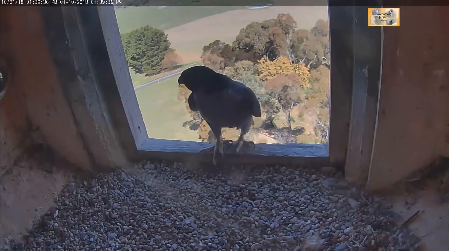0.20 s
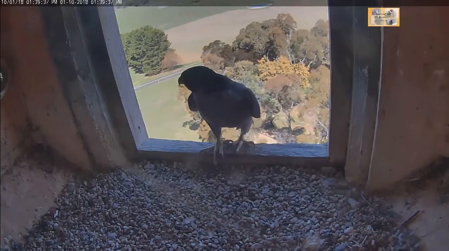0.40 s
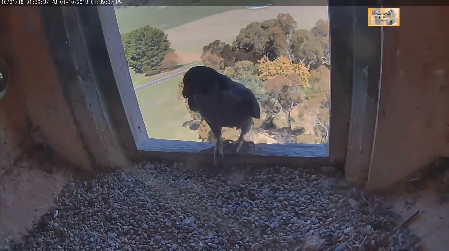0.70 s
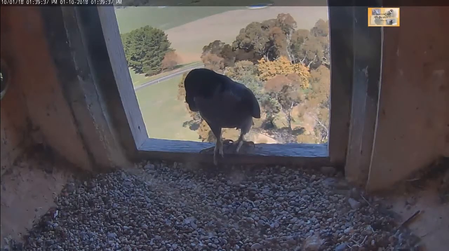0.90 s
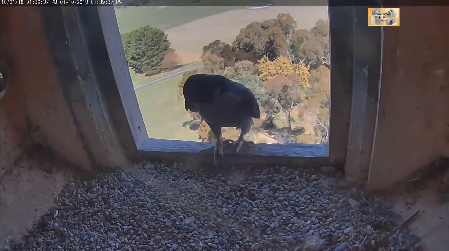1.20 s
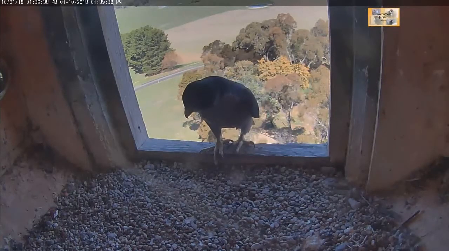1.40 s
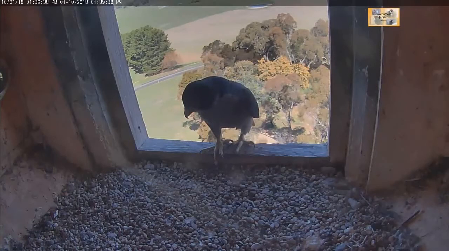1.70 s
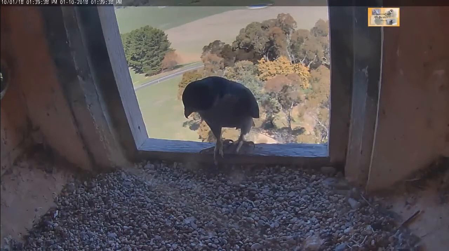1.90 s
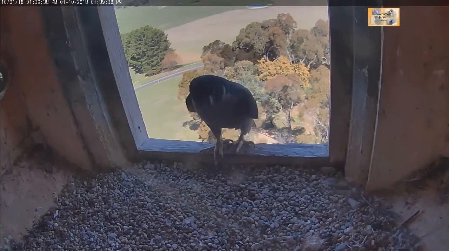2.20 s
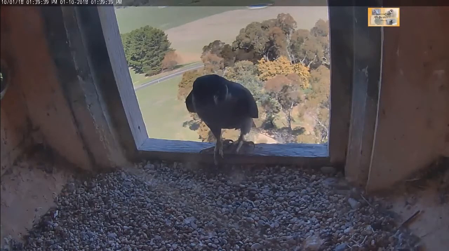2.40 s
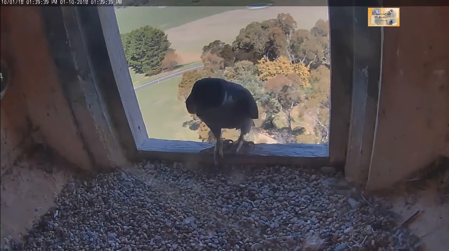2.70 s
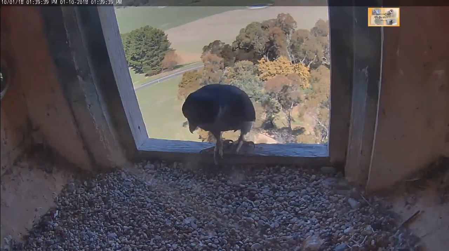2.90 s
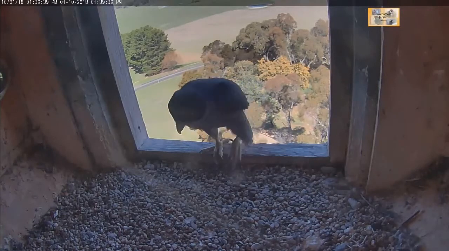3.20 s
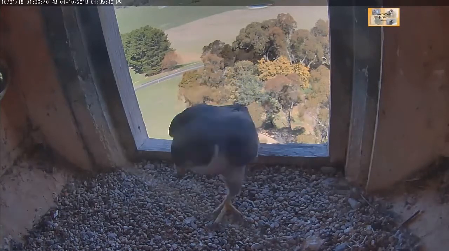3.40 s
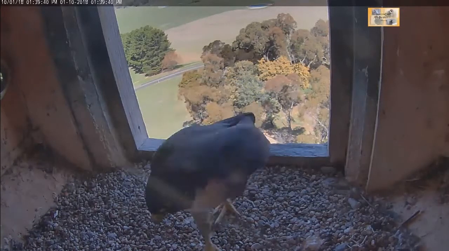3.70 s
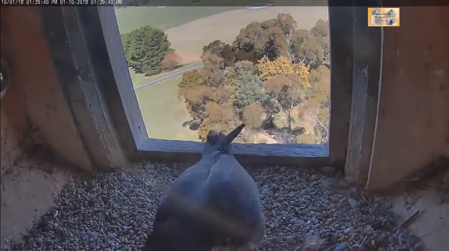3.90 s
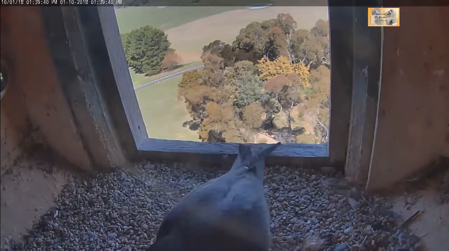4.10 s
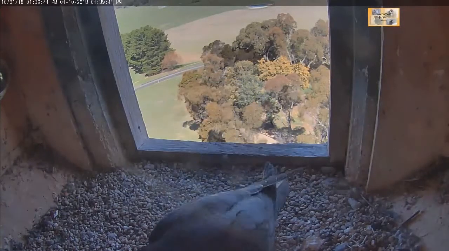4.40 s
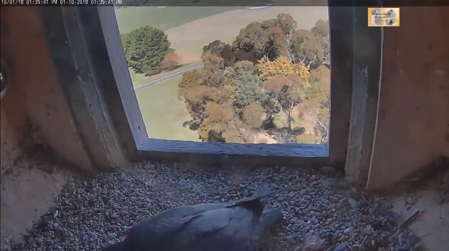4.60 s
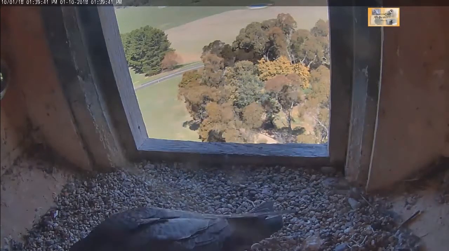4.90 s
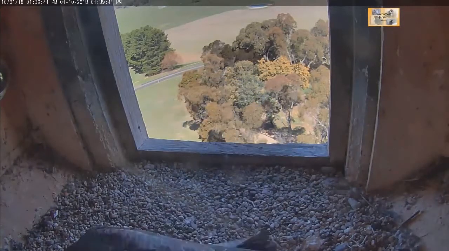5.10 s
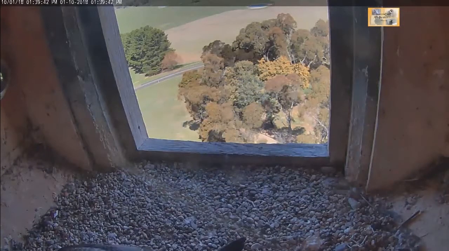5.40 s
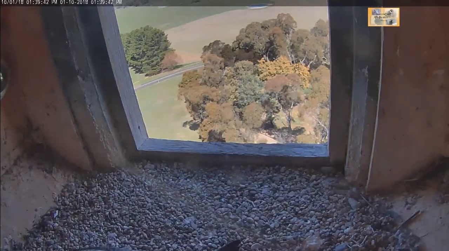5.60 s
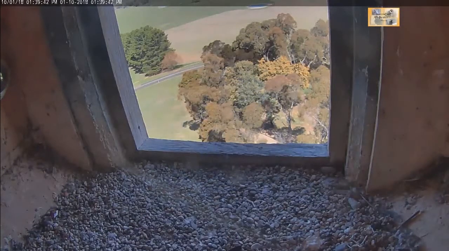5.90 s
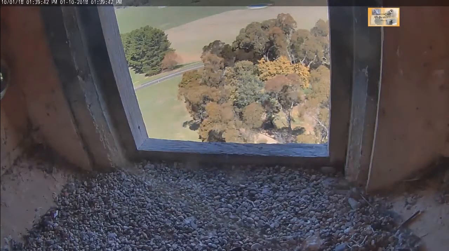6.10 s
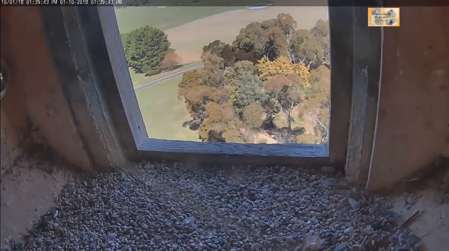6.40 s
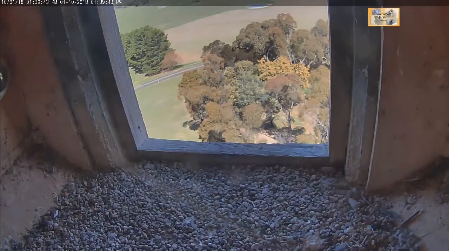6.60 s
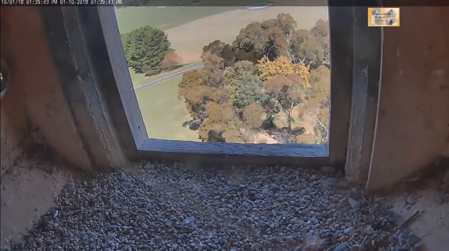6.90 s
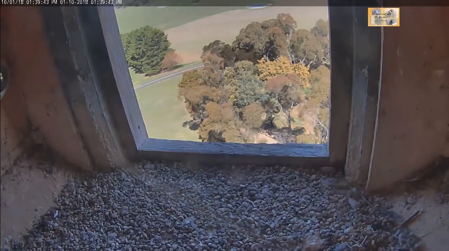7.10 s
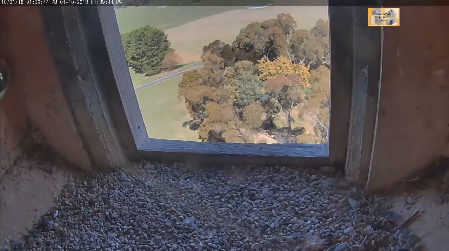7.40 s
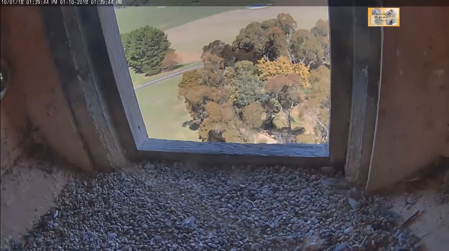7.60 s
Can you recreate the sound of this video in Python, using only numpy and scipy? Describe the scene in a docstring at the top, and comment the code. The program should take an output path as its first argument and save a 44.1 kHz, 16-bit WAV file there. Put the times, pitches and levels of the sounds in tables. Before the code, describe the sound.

From 0 to about 1.8 seconds there is only low, lumpy wind rumble with brief dropouts, bass-heavy outdoor air, a faint low drone wavering in spells until about 3.2, and a thin, high camera hiss that throbs and buzzes. At 1.8 a short falcon chirp climbs and snaps downward, repeating every third of a second or so. From 3.0 hoarser phrases join about twice a second, a swoop running into a chirp, led by tiny flicks, low rasps and, from 4.4 to 6.5, thin hissy squeaks. Sparse box echoes colour everything. Soft feet thud on gravel from 3.4, heaviest around 3.7 and 4.0, with dull scuffing until 6.2 and last steps near 5.8. A faint whistle holds around 5.3. Lone chirps stop near 6.6; rough phrases continue at about 7.0 and 7.6 over swelling wind.

```python
"""Falcons begging in a nest box

Begging chirps climb and dive; in longer phrases a flick, thin squeak and low rasp lead to a swoop and chirp.
The voices are near-sine glides that turn hoarse and hissy, coloured by echoes and resonances of the box.
A falcon steps and shuffles on gravel: filtered noise pushes ring the floor, and dull noise scuffs between.
Shaped noise makes the wind rumble, air and the camera's throbbing hiss; a wavering sine drones in spells."""
import sys
import numpy as np
from scipy import signal
from scipy.fft import rfft, irfft, next_fast_len
from scipy.io import wavfile
from scipy.ndimage import uniform_filter1d

SR = 44100
rng = np.random.default_rng(int(sys.argv[2]) if len(sys.argv) > 2 else 0)


def generate_wav(sig):
    """Save sig (samples, or channels by samples) to the path in sys.argv[1] as 16-bit PCM at SR."""
    pcm = np.round(np.clip(np.atleast_2d(sig).T, -1, 1) * 32767).astype(np.int16)
    wavfile.write(sys.argv[1], SR, pcm)


N = 342692
TIME = np.arange(N) / SR

# spectrum of the hiss in a breaking voice: f/Hz, level/dB (relative, per Hz)
CRACK_COLOUR = [(2500, -27), (3600, -15), (4600, 11), (5400, -3.5), (6000, 3), (7000, -13)]

# calls are timed where their fall passes the knee; chirps dive at one fixed rate
KNEE_HZ, DIVE_OCTAVES_PER_S = 3057, 39
SWOOP_S = .014  # from the start of a swoop to the knee


def amp(db):
    """Decibels to gain."""
    return 10 ** (np.asarray(db) / 20)


def unit(x):
    """Scales to rms 1."""
    return x / np.sqrt(np.mean(x ** 2) + 1e-20)


def add(mix, s, sound):
    """Mixes a sound in at time s, cutting it off at the end of the scene."""
    part = mix[max(round(s * SR), 0):][:len(sound)]
    part += sound[:len(part)]


def noise(colour):
    """Noise of rms 1 whose spectrum follows (Hz, dB) points along a log frequency axis."""
    hz, db = np.transpose(colour)
    f = np.fft.rfftfreq(N, 1 / SR)
    gain = amp(np.interp(np.log(f + 1), np.log(hz + 1), db))
    return unit(irfft(rfft(rng.standard_normal(N)) * gain, N))


def wander(size, rate_hz):
    """Smooth random drift, scaled to rms 1; its spectrum fades out around rate_hz."""
    length = next_fast_len(size + 8192)
    f = np.fft.rfftfreq(length, 1 / SR)
    spectrum = rfft(rng.standard_normal(length)) * np.exp(-(f / rate_hz) ** 2)
    return unit(irfft(spectrum, length))[:size]


def syrinx(hz, jitter, shimmer, octave_db):
    """A near-sine tone with unsteady pitch and strength and a weak octave."""
    unsteady_hz = hz * (1 + jitter * wander(len(hz), rate_hz=500))
    phase = 2 * np.pi * np.cumsum(unsteady_hz) / SR
    strength = 1 + shimmer * wander(len(hz), rate_hz=980)
    return np.sqrt(2) * strength * (np.sin(phase) + amp(octave_db) * np.sin(2 * phase))


def chirp(climb, dive, first_hz, top_hz, climb_db, dive_db, apex_db, bow):
    """Pitch and level of a chirp: a bowed climb, a rounded turn where the voice thins, a fixed-rate dive."""
    apex_round_s = .017
    swell_s, end_db = 0.0061, -3.5  # swell just before the knee, fade along the dive
    t = np.arange(-climb, dive, 1 / SR)  # 0 at the knee
    apex = -np.log2(top_hz / KNEE_HZ) / DIVE_OCTAVES_PER_S
    risen = np.interp(t, [-climb, apex], [0, 1]) ** bow
    climbing_hz = first_hz + (top_hz - first_hz) * risen
    diving_hz = KNEE_HZ * 2 ** (-DIVE_OCTAVES_PER_S * t)
    hz = np.minimum(climbing_hz, diving_hz)
    thin_db = climb_db + apex_db
    db = np.interp(t, [-climb, -climb / 2, -swell_s, 0, dive],
                   [climb_db, thin_db, thin_db, dive_db, dive_db + end_db])
    return uniform_filter1d(hz, int(apex_round_s * SR), mode="nearest"), db


def swoop(hold, trough_hz, swoop_db, trough_db):
    """Pitch and level of a swoop: it swells as it drops to the knee, then levels out in a trough."""
    from_hz, start_db = 4100, -7.5  # start level is relative to the knee
    t = np.arange(-SWOOP_S, hold, 1 / SR)
    drop = np.interp(t, [-SWOOP_S, 0], [from_hz, KNEE_HZ])
    trough = trough_hz + (KNEE_HZ - trough_hz) * (1 - t / hold) ** 3
    db = np.interp(t, [-SWOOP_S, 0, hold / 2], [swoop_db + start_db, swoop_db, trough_db])
    return np.where(t < 0, drop, trough), db


def phrase(s, hold, gap, dive, trough_hz, top_hz, swoop_db, trough_db, climb_db, apex_db, dive_db):
    """A swoop that runs on into a chirp: start, pitch and level."""
    first = swoop(hold, trough_hz, swoop_db, trough_db)
    second = chirp(gap - hold, dive, trough_hz, top_hz, climb_db, dive_db, apex_db, bow=0.93)
    return s - SWOOP_S, *np.hstack([first, second])


def song(calls, jitter, shimmer, octave_db, strain, crack):
    """Glides along each call's pitch and level, abrupt at the start, hoarser and hissier as it climbs."""
    # strength of the voice, weak at the break between registers: pitch f/Hz, level/dB (relative)
    registers = [(1200, 0), (1550, 3.5), (2000, -4.5), (2300, -3.5), (2550, -3.5), (3050, -1.5),
                 (3600, 0.5), (4300, 0.5), (5000, -6.5), (5900, -2)]
    # how far the voice breaks up into hiss, most below its highest register: pitch f/Hz, share/1 (relative)
    breakup = [(3700, 0.11), (4600, 1), (5300, 0.69), (5750, .25)]
    catch_db, catch_hz = 2.2, 130  # depth and rate at which the voice catches
    dive_jitter = .032  # extra pitch shake while plunging
    fade_s = .003  # start and end fades together
    out, hiss = np.zeros(N), noise(CRACK_COLOUR)
    for start, pitch, db in calls:
        hoarse = jitter + strain * np.clip(pitch / 3300 - 1, 0, .2)
        octaves_per_s = np.gradient(np.log2(pitch)) * SR
        hoarse = hoarse + dive_jitter * (octaves_per_s < -DIVE_OCTAVES_PER_S / 2)
        airy = np.clip(crack * np.interp(pitch, *np.transpose(breakup)), 0, 1)
        tone = syrinx(pitch, hoarse, shimmer, octave_db)
        breath = hiss[round(start * SR):][:len(tone)]
        voice = np.sqrt(1 - airy) * tone + np.sqrt(airy) * breath
        catches = catch_db * wander(len(db), rate_hz=catch_hz)
        level = amp(db + catches + np.interp(pitch, *np.transpose(registers)))
        add(out, start, voice * level * signal.windows.tukey(len(db), fade_s * SR / len(db)))
    return out


def chirp_voice():
    """Lone chirps, sung fairly clean with only a trace of octave."""
    # knee t/s, climb before it t/s, dive after it t/s, first f/Hz, top f/Hz before rounding,
    # level/dB at the start of the climb, level/dB at the knee (both relative)
    chirp_rows = [(1.832, 0.063, 0.019, 2850, 3870, -67, -61.5),
                  (2.174, 0.065, 0.012, 2880, 4230, -64, -62), (2.48, 0.06, 0.018, 2820, 4630, -63, -61),
                  (2.794, 0.057, 0.022, 2880, 4150, -63.5, -60),
                  (3.114, 0.073, 0.023, 2950, 4075, -66.5, -62.5),
                  (3.451, 0.076, 0.022, 2560, 4000, -65.5, -62),
                  (3.794, 0.067, 0.021, 2550, 4230, -65.5, -66.5),
                  (4.185, 0.082, 0.022, 2345, 4150, -67.5, -64.5),
                  (4.561, 0.052, 0.024, 2900, 4074, -75, -66),
                  (4.963, .056, 0.012, 2750, 3894, -64.5, -60.5),
                  (5.382, 0.035, 0.014, 2830, 3450, -66, -61),
                  (5.769, 0.076, 0.013, 2450, 4550, -65.5, -66.5),
                  (6.148, 0.04, 0.022, 2950, 3670, -70, -62), (6.569, 0.04, 0.023, 2900, 3520, -68, -64.5)]
    calls = [(s - climb, *chirp(climb, *rest, apex_db=-6.0, bow=0.98)) for s, climb, *rest in chirp_rows]
    return song(calls, jitter=.008, shimmer=.2, octave_db=-28, strain=.08, crack=.22)


def phrase_voice():
    """Swoops running into chirps, sung rougher and hissier than the lone chirps."""
    # swoop's knee t/s, trough's end after it t/s, chirp's knee after it t/s, last dive t/s,
    # trough f/Hz, chirp's top f/Hz before rounding, swoop level/dB, trough level/dB,
    # climb level/dB, thinning at the top level/dB (added to the climb), chirp's knee level/dB (all relative)
    phrase_rows = [(3.004, 0.021, 0.097, .014, 2604, 3470, -69, -60, -68.5, -3, -60),
                   (3.52, 0.025, 0.1, .018, 2280, 4410, -66, -62, -62.5, -18, -64.5),
                   (4.007, 0.013, 0.078, .016, 2900, 4250, -63.5, -66, -70.5, -9, -66),
                   (4.473, 0.019, 0.075, .026, 2466, 4080, -65.5, -69, -64.5, -3.5, -62.5),
                   (4.982, .035, .091, .014, 2270, 3620, -60.5, -72, -62, -12, -70.5),
                   (5.493, .018, 0.084, .012, 2292, 4330, -62.5, -66, -62, -16, -66.5),
                   (6.012, .025, .096, .014, 2400, 4170, -70, -67.5, -63, -18, -69),
                   (6.513, .03, 0.099, .018, 2400, 4000, -72, -69, -66, -14.5, -65.5),
                   (7.03, .021, .097, .014, 2316, 4020, -70.5, -65, -64, -16, -67),
                   (7.571, 0.024, 0.092, .016, 2223, 4280, -64.5, -70, -64, -18, -68)]
    calls = [phrase(*row) for row in phrase_rows]
    return song(calls, jitter=.021, shimmer=.42, octave_db=-17, strain=.05, crack=.45)


def notes():
    """Plain notes that open and close the calls: quick straight glides of a steady tone."""
    # start t/s, length t/s, first f/Hz, last f/Hz, level/dB (relative)
    flicks = [(2.097, 0.013, 1270, 1440, -78), (2.42, 0.017, 1190, 1300, -82.5),
              (2.978, 0.018, 2570, 2640, -72), (3.036, 0.013, 1230, 1500, -70),
              (3.36, 0.032, 1237, 1427, -69.5), (3.417, 0.015, 1340, 1553, -55),
              (3.432, 0.019, 2400, 3000, -72), (3.647, 0.023, 1724, 1195, -71),
              (3.715, 0.03, 1270, 1444, -72.5), (3.892, 0.006, 1440, 1690, -59.5),
              (3.894, 0.02, 3120, 2380, -74), (4.112, 0.0084, 1730, 1260, -63),
              (4.207, 0.0082, 1350, 1210, -66.5), (4.372, 0.0095, 1316, 1546, -57),
              (4.38, .018, 3170, 2390, -74), (4.572, 0.014, 1600, 1300, -60.5),
              (4.882, 0.031, 2310, 3760, -72.5), (4.977, 0.013, 1360, 1230, -65),
              (5.595, .016, 1596, 1260, -65), (5.685, 0.011, 1370, 1280, -68),
              (5.913, 0.021, 2600, 3480, -77), (6.122, 0.0084, 1715, 1540, -69),
              (6.426, 0.012, 2400, 2700, -77.5), (6.631, 0.0079, 1720, 1640, -73),
              (6.937, 0.012, 2400, 3250, -70.5), (7.454, 0.011, 1380, 1510, -60.5),
              (7.471, 0.011, 2350, 3280, -72), (7.68, 0.0091, 1750, 1610, -72)]
    out = np.zeros(N)
    for s, length, first_hz, last_hz, db in flicks:
        hz = np.linspace(first_hz, last_hz, int(length * SR))
        tone = syrinx(hz, jitter=0.0013, shimmer=0.044, octave_db=-14.0)
        add(out, s, amp(db) * tone * signal.windows.tukey(len(hz), .45))
    return out


def squeaks(hiss_db=-5):
    """Thin, hissing arches of high pitch that climb to a crest and tip over ahead of the swoops."""
    # crest t/s, rise t/s, top f/Hz, level/dB (relative), pitch jitter/1 (share of the pitch)
    arches = [(4.434, 0.029, 5920, -70.5, .012), (4.951, 0.056, 5780, -77, .045),
              (5.455, 0.045, 5820, -78.5, 0.039), (5.98, 0.043, 5880, -76, .02),
              (6.49, 0.045, 5860, -83, 0.022)]
    fall_s, sag = .032, .2  # sag: share of the pitch lost at either end
    out, hiss = np.zeros(N), amp(hiss_db) * noise(CRACK_COLOUR)
    for s, rise, top_hz, db, hoarse in arches:
        t = np.arange(-rise, fall_s, 1 / SR)
        along = np.interp(t, [-rise, 0, fall_s], [-1, 0, 1])
        tone = syrinx(top_hz * (1 - sag * along ** 2), hoarse, shimmer=.4, octave_db=-40)
        breath = hiss[round(s * SR):][:len(t)]
        add(out, s - rise, amp(db) * (tone + breath) * signal.windows.tukey(len(t), .6))
    return out


def whine():
    """One soft, held whistle, almost level in pitch, that fades into the next call."""
    # t/s, f/Hz, level/dB (relative)
    whistle = [(5.255, 1285, -80), (5.3, 1335, -78.5), (5.36, 1315, -83), (5.44, 1275, -87)]
    s, hz, db = np.transpose(whistle)
    t, out = np.arange(s[0], s[-1], 1 / SR), np.zeros(N)
    tone = syrinx(np.interp(t, s, hz), jitter=.002, shimmer=0.065, octave_db=-22)
    add(out, s[0], amp(np.interp(t, s, db)) * tone * signal.windows.tukey(len(t), .08))
    return out


def rasps(first_hz=1230, top_hz=1480, last_hz=1330):
    """An uneven rattle of tiny tone bursts that swells and rises in pitch, then sinks away."""
    # loudest t/s, swell t/s, fade t/s, level/dB (relative)
    rasp_rows = [(2.991, 0.1, 0.032, -73), (3.515, 0.068, 0.036, -65), (3.646, .07, 0.043, -68.5),
                 (4.0, 0.11, 0.095, -68), (4.48, 0.12, 0.058, -70), (4.981, 0.062, 0.02, -66),
                 (5.495, 0.037, 0.063, -68.5), (5.6, 0.067, .05, -72.5), (6.014, 0.078, 0.054, -67.5),
                 (6.11, .04, 0.078, -71), (6.527, 0.12, .05, -68.5), (7.042, 0.077, 0.036, -68),
                 (7.109, 0.052, 0.05, -71.5), (7.578, 0.086, 0.039, -66.5)]
    # harmonics of a burst from the fundamental up: level/dB (relative)
    harmonics_db = [0, -14, -17, -14]
    rattle_hz, rattle_spread = 175, .4  # bursts per second, timing scatter as a share of their spacing
    grain_s, grain_spread_db, grain_spread_octaves = .008, 3, .12
    edge_db = -13  # level at either end, relative to the loudest point
    t, out = np.arange(0, grain_s, 1 / SR), np.zeros(N)
    window = signal.windows.hann(len(t))
    for loudest, rise, fall, db in rasp_rows:
        knots = [-rise, 0, fall]
        beats = np.arange(-rise, fall, 1 / rattle_hz)
        for beat, (late, sharp, strong, turn) in zip(beats, rng.standard_normal((len(beats), 4))):
            hz = np.interp(beat, knots, [first_hz, top_hz, last_hz]) * 2 ** (grain_spread_octaves * sharp)
            level = db + np.interp(beat, knots, [edge_db, 0, edge_db]) + grain_spread_db * strong
            burst = sum(amp(part) * np.sin(2 * np.pi * k * (hz * t + turn))
                        for k, part in enumerate(harmonics_db, 1))
            start = loudest + beat + rattle_spread * late / rattle_hz - grain_s / 2
            add(out, start, amp(level) * unit(window * burst))
    return out


def reflections(x, delay=.004, count=8):
    """The walls throw back a short tail of sparse echoes, whose pattern changes as the birds move."""
    posture_s, t60_s = .52, .13  # how long a bird holds still, decay time of the box
    t, out = np.arange(SR // 4) / SR, np.zeros(N)
    for k in range(count):
        sparse = rng.standard_normal(len(t)) * (rng.random(len(t)) < 2000 / SR)
        taps = sparse * (t > delay) * amp(-60 * t / t60_s)
        here = (TIME // posture_s) % count == k
        out += signal.oaconvolve(x * here, taps / np.linalg.norm(taps))[:N]
    return out


def ringing(x):
    """A few narrow modes of the box linger faintly after the calls."""
    # f/Hz, width f/Hz, level/dB
    modes = [(1305, 45, -13), (1500, 45, -13), (2451, 35, -10.5), (2740, 35, -8), (3081, 40, -10)]
    return sum(amp(db) * signal.lfilter(*signal.iirpeak(hz, hz / width, fs=SR), x) for hz, width, db in modes)


def housing(x):
    """Fixed resonances flare up as each glide passes through them; a notch lies between the lower ones."""
    # resonances of box and camera housing: f/Hz, width f/Hz, level/dB (relative)
    resonances = [(1242, 277, 1), (1643, 210, 2.5), (2460, 170, 4), (2680, 700, -8.5), (3085, 170, 0),
                  (3600, 280, -7), (4510, 1300, -10.5), (6000, 1700, 0)]
    valley_db, notch_hz, notch_width_hz, notch_db = -17, 2000, 200, -5
    f = abs(np.fft.fftfreq(4096, 1 / SR))
    peaks = sum(amp(db) / (1 + (2 * (f - hz) / width) ** 2) ** 1.5 for hz, width, db in resonances)
    gain = amp(valley_db) + peaks
    gain = gain * amp(notch_db * np.exp(-((f - notch_hz) / notch_width_hz) ** 2))
    # minimum phase: the response starts at once and rings on
    ring = np.fft.ifft(np.exp(np.conj(signal.hilbert(np.log(gain))))).real[:1024]
    return signal.fftconvolve(x, ring)[:N]


def birds(rasp_db=-3.5, near_echo_db=-10, deep_echo_db=-6.5):
    """All voices with the box's echo and colour; phrases come from deeper in the box and echo more."""
    near = chirp_voice() + notes() + squeaks() + whine()
    deep = phrase_voice() + amp(rasp_db) * rasps()
    voices = near + deep + reflections(amp(near_echo_db) * near + amp(deep_echo_db) * deep)
    return housing(voices + ringing(voices))


def footfalls(settle=.02, rise=.006, soft_hz=270):
    """Each soft foot presses the gravel in a short uneven push that booms through the floor."""
    # t/s, knock level/dB, weight in the deep bass level/dB
    steps = [(3.356, -63.5, -74), (3.657, -55, -53), (3.763, -63, -65.5), (4.033, -53.5, -55.5),
             (4.136, -61.5, -57.5), (4.286, -58.5, -62), (4.791, -72.5, -63), (5.369, -68, -66.5),
             (5.48, -66, -63.5), (5.697, -62, -61.5), (5.78, -65.5, -64)]
    # the floor's boom: f/Hz, level/dB (relative), decay by 60 dB t/s
    floor_modes = [(40.33, -12, 0.94), (78.4, -13.5, 0.24), (109.5, -14, 0.28), (147.9, -5.5, 0.75),
                   (177, -5.5, 0.28), (178.3, 8.5, 0.25), (206.7, 7, 0.4), (218, -28, 0.25),
                   (292, -31, 0.65), (364, -4.5, 0.084)]
    deep_hz = 110  # modes below answer the weight of a step, the others its knock
    hard_step_db, dulling_db_per_octave = -53.5, 22  # steps lighter than a hard one are also duller
    t = np.arange(SR * 3 // 4) / SR
    rings = np.array([amp(db - 60 * t / t60) * np.sin(2 * np.pi * hz * t) for hz, db, t60 in floor_modes])
    deep = np.array(floor_modes)[:, 0] < deep_hz
    out = np.zeros(N)
    for s, knock_db, weight_db in steps:
        edge_hz = soft_hz * 2 ** ((knock_db - hard_step_db) / dulling_db_per_octave)
        push = rng.standard_normal(len(t)) * np.exp(-t / settle) * (1 - np.exp(-t / rise))
        push = signal.sosfilt(signal.butter(3, edge_hz, fs=SR, output="sos"), push)
        for modes, db in (~deep, knock_db), (deep, weight_db):
            thud = signal.fftconvolve(push, rings[modes].sum(0))[:len(t)]
            add(out, s, amp(db) * thud / np.std(thud[:SR // 10]))  # levelled over its first 0.1 s
    return out


def shuffling(trim_db=1, scuff_edge=0.35):
    """Dull scuffing of the falcon between its steps: spells of low noise with soft edges."""
    # start t/s, end t/s, level/dB (before the trim)
    spells = [(3.71, 3.981, -62), (4.06, 4.762, -61.5), (4.68, 5.14, -62.5), (5.076, 5.908, -63.5),
              (5.895, 6.16, -65)]
    # spectrum of the scuffs: f/Hz, level/dB (relative, per Hz)
    scuff_colour = [(28, -5), (40, 12.5), (56, -6.5), (76, -14), (92, -2), (120, -11.5), (140, -10.5),
                    (165, 1.5), (190, 2), (222, -3), (245, -15.5), (280, -21), (350, -29), (500, -34.5),
                    (900, -51)]
    scuffs = np.zeros(N)
    for start, end, db in spells:
        add(scuffs, start, amp(db) * signal.windows.tukey(int((end - start) * SR), scuff_edge))
    return amp(trim_db) * scuffs * noise(scuff_colour)


def wind(trim_db=2):
    """Gusts on the box: low noise that follows a drawn level and arrives in lumps."""
    # gusts before and after the falcon's walk, a list for each: t/s, level/dB (before the trim)
    gusts = [
        [(0.05, -67.5), (1.3, -66), (1.33, -93), (1.46, -68), (1.57, -98), (1.62, -66.5), (3.05, -65),
         (3.29, -74.5), (3.55, -66.5)],
        [(5.3, -66), (5.47, -65), (6.08, -63), (6.12, -90), (6.18, -63), (7.06, -68.5), (7.08, -76),
         (7.33, -64.5), (7.7, -63)],
    ]
    # spectrum of the rumble: f/Hz, level/dB (relative, per Hz)
    rumble_colour = [(8, -3), (22, -2.5), (38, 5), (52, -6.5), (63, 0), (78, 2), (95, -11.5), (125, -15),
                     (160, -13), (230, -23.5), (330, -35), (600, -92.5)]
    gust_db = np.interp(TIME, *np.vstack(gusts).T) + 2 * wander(N, rate_hz=10.0)
    return amp(trim_db + gust_db) * noise(rumble_colour)


def drone(pitch_hz=119):
    """A faint low sine of wavering pitch that swells in spells."""
    # start t/s, end t/s, level/dB
    spells = [(.03, 0.404, -72), (.8, 1.153, -73.5), (1.58, 1.798, -76), (1.956, 2.434, -70),
              (2.723, 3.201, -70.5)]
    out = np.zeros(N)
    for start, end, db in spells:
        size = int((end - start) * SR)
        phase = 2 * np.pi * np.cumsum(pitch_hz * (1 + .05 * wander(size, rate_hz=15))) / SR
        add(out, start, amp(db) * np.sqrt(2) * np.sin(phase) * signal.windows.tukey(size, .6))
    return out


def outdoor_air(air_db=-68):
    """Steady outdoor air: noise weighted to the bass."""
    # f/Hz, level/dB (relative, per Hz)
    air_colour = [(20, 0.5), (60, -7), (100, -25.5), (150, -17), (200, -4.5), (240, -13), (290, -19.5),
                  (400, -25), (700, -29.5), (1050, -30.5), (1300, -29), (1900, -33), (2500, -33),
                  (2720, -27), (2900, -33), (7000, -43)]
    return amp(air_db) * noise(air_colour)


def camera_hiss(hiss_db=-79.0):
    """The camera's hiss, whose strength throbs with the electronics and so buzzes faintly."""
    # spectrum of the hiss: f/Hz, level/dB (relative, per Hz)
    hiss_colour = [(1500, -26.5), (3500, -14), (4100, -12.5), (4350, -10), (4560, -11), (4730, 3),
                   (4880, -10.5), (5120, -9.5), (5550, -2.5), (6100, -1.5), (6320, -6.5), (6700, -3.5),
                   (7100, -12), (7600, -29)]
    # throbs in its strength: f/Hz, depth/1 (share of the steady strength)
    throbs = [(30, 0.19), (112.2, 0.23), (224.4, 0.18), (448.8, 0.058)]
    throb = 1 + sum(depth * np.cos(2 * np.pi * (hz * TIME + rng.random())) for hz, depth in throbs)
    return amp(hiss_db) * throb * noise(hiss_colour)


def scene():
    """Everything at the one microphone."""
    falcons = birds() + footfalls() + shuffling()
    background = wind() + drone() + outdoor_air() + camera_hiss()
    return (falcons + background)[None]


def record(dry, offset=0.018, converter_db=-98):
    """The camera's narrow band, and the faint hiss and constant offset of its converter."""
    edge_hz, top_hz = 7600, 15000  # low-passes before and after the converter's hiss
    edge = signal.firwin(255, edge_hz, window=("kaiser", 8), fs=SR)[None]
    top = signal.firwin(255, top_hz, window=("kaiser", 8), fs=SR)[None]
    narrow = signal.oaconvolve(dry, edge, "same")
    hissy = narrow + amp(converter_db) * rng.standard_normal(N)
    return signal.oaconvolve(hissy, top, "same") + offset


dry = scene()
out = record(dry)
generate_wav(out)
```